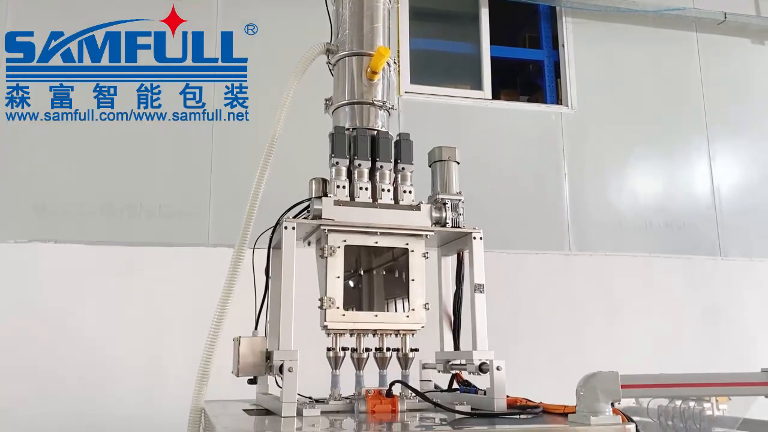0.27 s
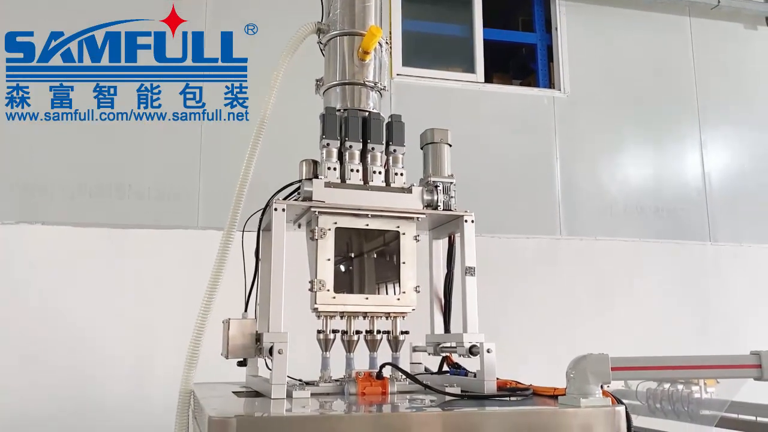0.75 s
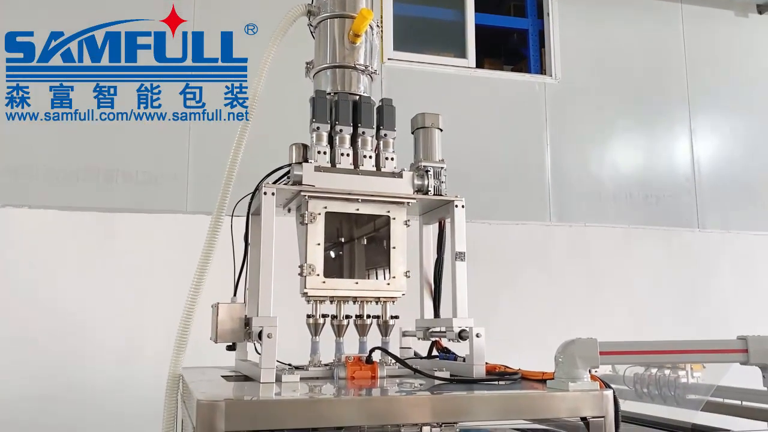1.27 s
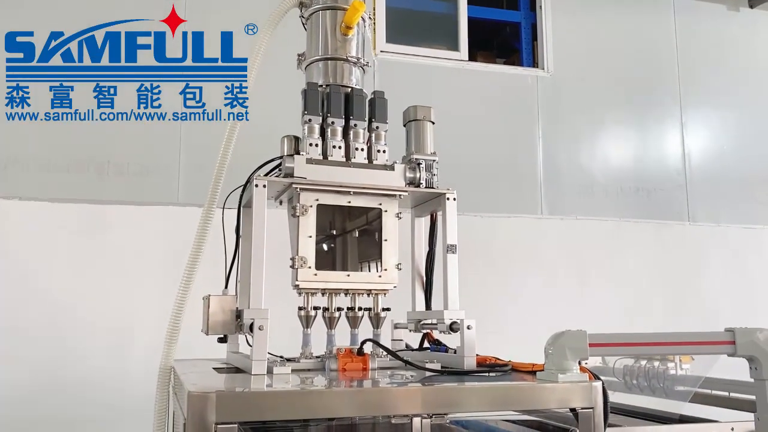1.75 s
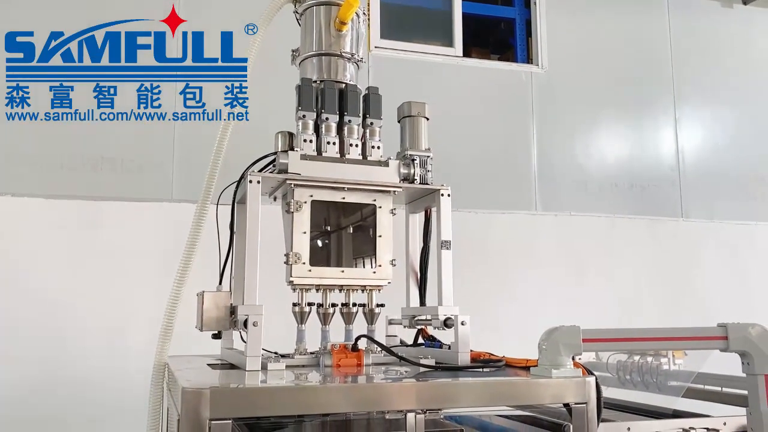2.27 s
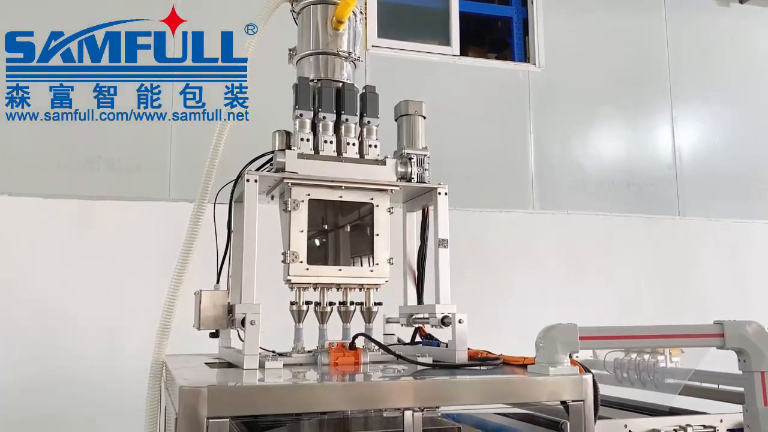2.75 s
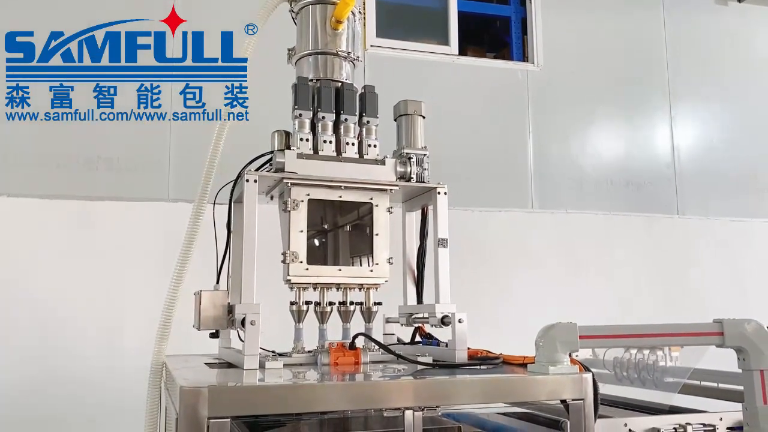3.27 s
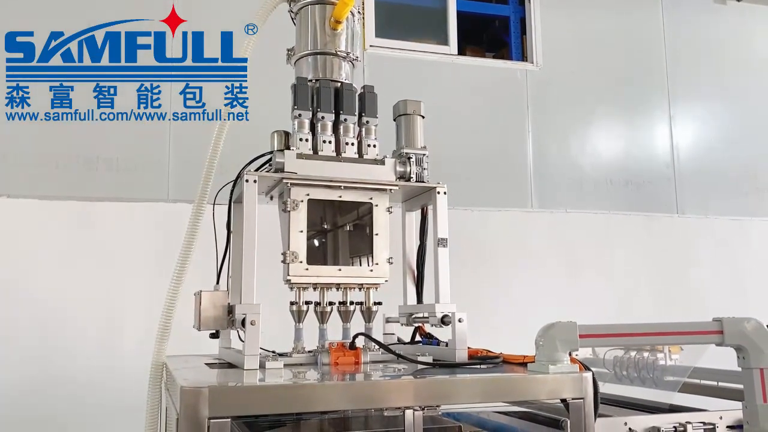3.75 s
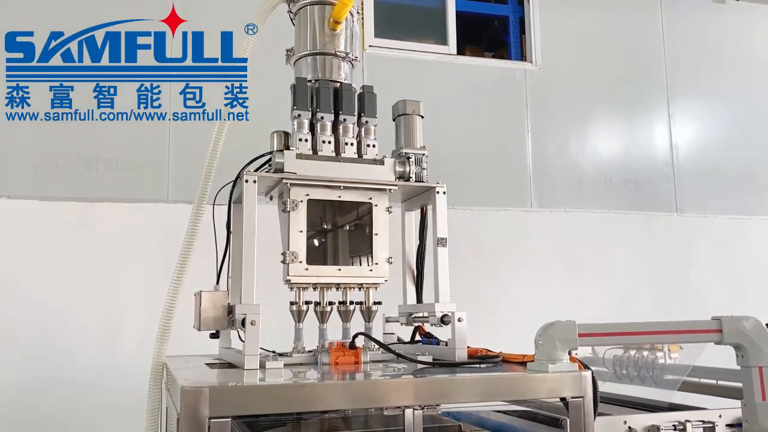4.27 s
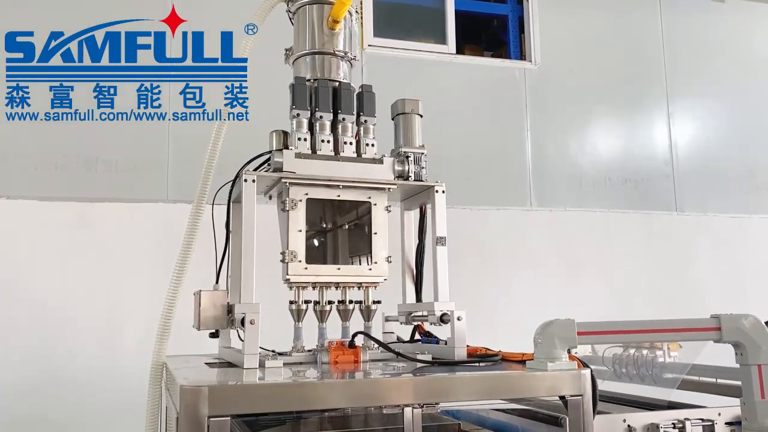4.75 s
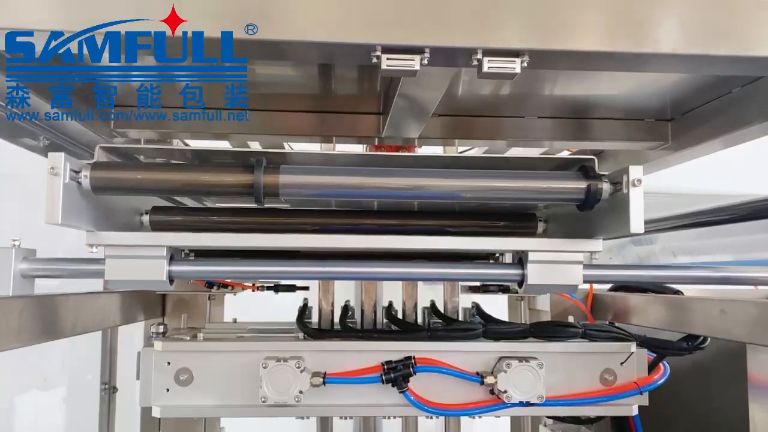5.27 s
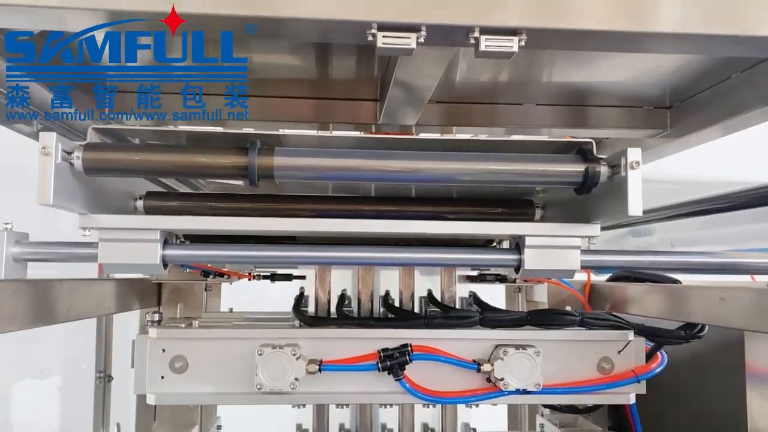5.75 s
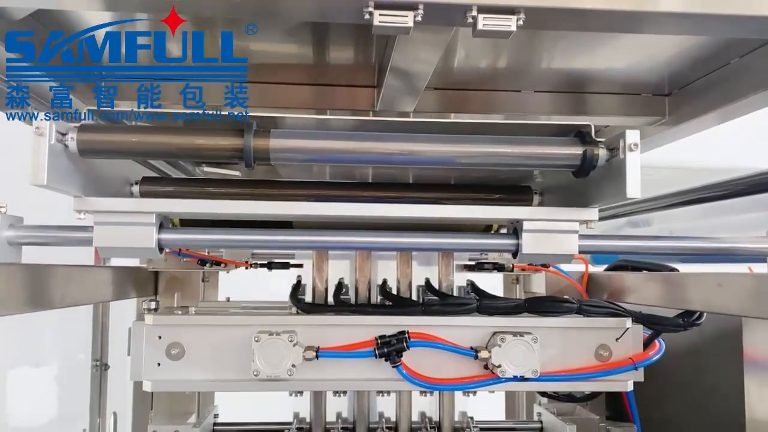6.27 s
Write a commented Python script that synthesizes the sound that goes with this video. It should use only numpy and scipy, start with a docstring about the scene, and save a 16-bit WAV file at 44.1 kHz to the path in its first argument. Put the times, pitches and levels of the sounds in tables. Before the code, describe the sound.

A packing machine is heard from a distance in a factory hall, over a pump hum and the murmur of other machines. Its drive is already running, shudders deeply at 0.4 seconds, then coasts down, rumbling, droning and rattling with a rapid metallic scrape. Cylinders thump and clack irregularly throughout, and two servos hold a thin, stuttering high whine. Valves vent air at about 1.9 and 2.3 seconds, and a rough motor buzz lasts from 2.3 to 3.1, with a short squeak near its end. At 3.2 the drive spins up again with another puff and a cluster of thumps. A squeaky groan follows from 4 to 4.6. Just before 5 seconds comes a blink of silence, and the whine ends. The machine returns close up, under its rollers, with a stronger drone, constant hiss, more thumps and air puffs at 5.4 and 6.4 seconds.

```python
"""A factory hall with a powder packing machine, heard from afar, then, after a blink of silence, from
under its rollers. In each stroke the drive spins up, holds and coasts down, scraping once a turn;
the frame rumbles, drones and rattles with its speed. Cylinders thump against their stops, valves vent
air, a feed motor buzzes between two strokes and a few squeaks come and go.
Behind it all a pump hums and distant machines murmur; two servos whine until the silence."""
import sys
import numpy as np
from scipy import signal
from scipy.fft import rfft, irfft, next_fast_len
from scipy.io import wavfile
from scipy.ndimage import uniform_filter1d, map_coordinates

SR = 44100
rng = np.random.default_rng(int(sys.argv[2]) if len(sys.argv) > 2 else 0)


def pcm_store(signal):
    """Save signal as 16-bit PCM."""
    levels = np.round(np.clip(np.atleast_2d(signal), -1, 1) * 32767)
    wavfile.write(sys.argv[1], SR, levels.astype(np.int16).T)


N = 287532
TIME = np.arange(N) / SR
GAP_START_S, GAP_END_S = 4.93, 4.961  # the silence between far and near
TOP_SPEED, IDLE_SPEED = 46.9, 14  # turns a second
DRIVEN_S = .71  # the drive is powered this long in each stroke


def amp(db):
    """Decibels to gain."""
    return 10 ** (np.asarray(db) / 20)


def unit(x):
    """Scaled to rms 1."""
    return x / np.sqrt(np.mean(x ** 2) + 1e-20)


def along(points, hz):
    """A curve of (f/Hz, value) points, read on a log frequency axis."""
    f, values = np.transpose(points)
    return np.interp(np.log(hz + 1), np.log(f + 1), values)


def wobble(rate):
    """A smooth random curve with `rate` knots a second."""
    return map_coordinates(rng.standard_normal(int(N * rate / SR) + 4), [TIME * rate], order=2)


def phase_of(hz):
    """Running phase of a frequency curve."""
    return 2 * np.pi * np.cumsum(hz) / SR


def filtered(x, response):
    """x through an EQ whose gain is a function of frequency."""
    size = next_fast_len(N + SR // 4)
    return irfft(rfft(x, size) * response(np.fft.rfftfreq(size, 1 / SR)), size)[..., :N]


def coloured(x, spectrum):
    """x shaped by a (f/Hz, level/dB) curve, at rms 1."""
    return unit(filtered(x, lambda hz: amp(along(spectrum, hz))))


def ringing(modes, f):
    """Summed response of resonances given as (f/Hz, width/Hz, level/dB)."""
    return sum(amp(db) * 1j * f * width / (hz * hz - f * f + 1j * f * width) for hz, width, db in modes)


def diffuse(pair, spectrum):
    """Two unrelated signals as one sound from all round: centred bass, wide treble."""
    # likeness of left and right: f/Hz, correlation
    likeness = [(60, 0.98), (130, 0.94), (250, 0.98), (400, 0.72), (700, 0.18), (3000, 0.4), (15000, 0.084)]
    spread = lambda hz: np.arccos(np.clip(along(likeness, hz), -1, 1)) / 2
    response = lambda hz: amp(along(spectrum, hz)) * [np.cos(spread(hz)), np.sin(spread(hz))]
    mid, side = filtered(pair, response)
    return unit(np.array([mid + side, mid - side]))


def factory(hall_db=-32):
    """The bed: distant machines fill the hall under an unsteady pump hum."""
    # pump and mains tones: f/Hz, level/dB
    tones = [(99, -38), (247.6, -44.5), (298, -43.5), (495.3, -44.5), (990.5, -55), (1733, -66),
             (1986, -61), (2234, -59), (2729, -64.5)]
    # room tone: f/Hz, relative level/dB
    room_tone = [(20, -51), (45, -0.5), (100, 3), (250, -4.5), (550, -10.5), (1000, -17), (2000, -20.5),
                 (4000, -28.5), (6500, -31.5), (8500, -49.5), (12000, -30.5), (15500, -72)]
    hum = sum(amp(db + 2.66 * wobble(9.8)) * np.sin(2 * np.pi * hz * TIME + 0.74 * wobble(12))
              for hz, db in tones)
    murmur = amp(hall_db) * diffuse(rng.standard_normal((2, N)), room_tone)
    return (np.sqrt(2) * hum + murmur) * amp([[.6], [-.6]])


def stroke():
    """The machine's cycle: per sample, the age/s of the current stroke, then its settings."""
    # drive strokes: t/s, time already run/s, scrape level/dB, scrape's speed exponent,
    # rattle level/dB, rattle linger/s, rattle's speed exponent, rattle floor/dB
    strokes = [(0, 0.26, -28, 3.3, -25, 0.21, 2.97, -43.5),
               (3.17, 0.017, -28.5, 4.2, -24.5, 0.26, 2.5, -34),
               (4.95, 0.61, -30, 7, -25.5, .33, 4.8, -38.5)]
    rows = np.array(strokes)
    start, already_run, *settings = rows[np.searchsorted(rows[1:, 0], TIME)].T
    return TIME - start + already_run, *settings


def drive_speed(linger_s=0, spin_up_s=.09, half_speed_s=1.1):
    """Turns a second: the drive spins up, holds, then coasts down towards idle."""
    age = np.maximum(stroke()[0], 0)
    spin_up = 1 - np.exp(-age / spin_up_s)
    coasting_s = np.maximum(age - DRIVEN_S - linger_s, 0)
    return np.maximum(TOP_SPEED * spin_up / (1 + coasting_s / half_speed_s), IDLE_SPEED)


def speed_db(speed):
    """A speed in dB relative to top speed."""
    return 20 * np.log10(speed / TOP_SPEED)


def frame(spectrum, base_db, gear_db, drone_db, base_exponent, drone_exponent, heave_db, critical_db):
    """The heavy base rumbles, heaves and carries the gear tones; the panels drone above it."""
    # vibration of the geared shafts: multiple of drive speed, relative level/dB
    gear_orders = [(1, -4), (1.5, -0.5), (2, -1.5), (3, -2), (5, -3), (9, -14.5)]
    split_hz, crest_s, heave_period_s = 165, 0.44, 0.36
    critical_speed, critical_width = 33.5, 8  # turns a second
    age, speed = stroke()[0], drive_speed()
    shake = diffuse(rng.standard_normal((2, N)), spectrum)
    base = filtered(shake, lambda f: 1 / (1 + (f / split_hz) ** 8))
    shaft = phase_of(speed)
    gears = unit(sum(amp(db + 2.5 * wobble(8.2)) * np.sin(order * shaft + 0.4 * wobble(7))
                     for order, db in gear_orders))
    rumble = amp(base_db) * unit(base) + amp(gear_db) * (speed / speed.max()) ** 3 * gears
    heave = np.cos(2 * np.pi * (age - crest_s) / heave_period_s) * (speed > TOP_SPEED / 2)
    rumble *= amp(base_exponent * speed_db(speed) + heave_db * heave)
    # coasting through a critical speed excites the panels
    resonance = np.exp(-((speed - critical_speed) / critical_width) ** 2) * (age > DRIVEN_S)
    drone = amp(drone_db + drone_exponent * speed_db(speed) + critical_db * resonance) * unit(shake - base)
    return rumble * amp([[.4], [-.4]]) + drone * amp([[1.3], [-1.3]])


def sheet_metal(t60, ring_db=-5):
    """Stereo noise coloured by the crowded resonances of sheet metal."""
    noise = rng.standard_normal((2, N))
    t = np.arange(SR // 8) / SR
    ring = rng.standard_normal((2, len(t))) * amp(-60 * t / t60)
    return noise + amp(ring_db) * unit(signal.fftconvolve(noise, ring, axes=1)[:, :N])


def rattle(spectrum, modes, trim_db, knock_db, knocks_per_s=110, decay_s=0.0058):
    """Loose parts knock at random on the panels and are the last to settle as the drive slows."""
    *_, top_db, linger_s, exponent, floor_db = stroke()
    level_db = np.maximum(top_db + exponent * speed_db(drive_speed(linger_s)), floor_db)
    level_db += trim_db + 0.32 * wobble(14)
    knocks = (rng.random(N) < knocks_per_s / SR) * amp(0.53 * rng.standard_normal(N))
    bursts = unit(signal.lfilter([1], [1, -np.exp(-1 / (decay_s * SR))], knocks))
    clatter = np.hypot(1, amp(knock_db) * bursts) * sheet_metal(t60=0.25)
    panels = filtered(clatter, lambda f: 1 + ringing(modes, f))
    return amp(level_db) * diffuse(panels, spectrum) * amp([[.3], [-.3]])


def machine_far():
    """The shaking frame from a distance: its drone swells as the drive coasts."""
    # rumble and drone EQ: f/Hz, relative level/dB
    rumble_eq = [(24, -41), (40, 3), (54, -1), (75, 7), (98, 4), (118, 0.5), (150, 1), (183, -2.5),
                 (222, -1), (257, -4.5), (338, -8.5), (388, -12), (422, -12.5), (464, -20), (500, -13),
                 (650, -28.5), (1100, -120)]
    # rattle EQ: f/Hz, relative level/dB
    rattle_eq = [(280, -34), (420, 2.5), (480, -1.5), (560, 1.5), (720, -3.5), (870, -4.5), (1130, -6),
                 (1450, -9.5), (1750, -9.5), (2400, -16.5), (4000, -20.5), (8000, -25), (15000, -127)]
    # panel resonances: f/Hz, width/Hz, level/dB over the rattle
    panel_modes = [(723, 27, -0.5), (1095, 29, 1), (1156, 23, -1.5), (1243, 18, -6), (1410, 15, 3.5),
                   (1757, 59, -8)]
    body = frame(rumble_eq, base_db=-24, gear_db=-22, drone_db=-24.8,
                 base_exponent=1.36, drone_exponent=1.42, heave_db=1.38, critical_db=4.5)
    return body + rattle(rattle_eq, panel_modes, trim_db=-2.5, knock_db=-5)


def scrape(burst_s=0.0029, far_catch_db=11.5, near_catch_db=2, build_db_per_s=5.5):
    """The drive rubs all the time and catches hard once a turn, ringing the steel."""
    # steel resonances: f/Hz, width/Hz, relative level/dB
    steel_modes = [(6660, 194, -3), (10040, 460, -9), (11690, 60, -4), (12050, 163, 0), (13100, 900, -11)]
    # friction hiss beneath them: f/Hz, relative level/dB
    hiss_eq = [(800, -31), (2800, -12.5), (4300, -12), (5500, -10.5), (11000, -15), (15500, -34)]
    age, top_db, exponent, *_ = stroke()
    speed = drive_speed()
    level_db = top_db + exponent * speed_db(speed) - build_db_per_s * np.maximum(DRIVEN_S - age, 0)
    turns = np.cumsum(speed) / SR
    burst_age = turns % 1 / speed / burst_s
    scatter_db = 1.7 * rng.standard_normal(512)
    catch_db = np.where(TIME < GAP_START_S, far_catch_db, near_catch_db) + scatter_db[turns.astype(int)]
    burst = (2 * burst_age * np.exp(1 - 2 * burst_age)) ** 2
    catch = amp(catch_db) * speed / TOP_SPEED * burst  # harder at speed
    friction = np.hypot(1, catch) * amp(0.56 * wobble(1500)) * rng.standard_normal(N)
    steel = filtered(friction, lambda f: np.hypot(abs(ringing(steel_modes, f)), amp(along(hiss_eq, f))))
    return amp(level_db) * unit(steel)


def hall_tail():
    """A stereo reverb tail whose treble dies first."""
    # decay of the hall: f/Hz, t60/s
    decay = [(200, 0.81), (3000, 0.34), (12000, 0.015)]
    hz, t, noise = signal.stft(rng.standard_normal((2, SR // 3)), SR, nperseg=256)
    t60 = along(decay, hz)[:, None]
    tail = signal.istft(noise * amp(-60 * t / t60) / np.sqrt(t60), SR, nperseg=256)[1]
    return tail / np.linalg.norm(tail[0])


def in_hall(x, block=16384, left_lead_s=.000163):
    """The direct sound arrives on the left first; the walls add an ever-changing tail."""
    # wet mix: f/Hz, share of power that comes off the walls
    wet_mix = [(300, 0.7), (3000, 1), (5000, 0.8), (6500, 0.31), (9000, 0.0037), (15000, 0.046)]
    wet = np.zeros((2, N + SR))
    for start in range(0, N, block):
        echo = signal.fftconvolve(x[None, start:start + block], hall_tail(), axes=1)
        wet[:, start:start + echo.shape[1]] += echo
    share = lambda f: np.clip(along(wet_mix, f), .01, .99)
    lead = lambda f: np.exp(1j * np.pi * f * left_lead_s * np.array([[1], [-1]]))
    direct = filtered(x, lambda f: np.sqrt(1 - share(f)) * lead(f))
    return direct + filtered(wet[:, :N], lambda f: np.sqrt(share(f)))


def servo_whine(start_hz=5828, creep_hz_per_s=27, beat_hz=17, second_gain=.8, skew_rad=0.73):
    """Two servos sing a thin note and its octave, stuttering as they beat; lost under the rollers."""
    # whine faders: t/s, note level/dB, octave level/dB
    faders = [(0, -52, -53), (.85, -50.5, -53), (1.15, -44.5, -50), (1.45, -47, -50), (1.73, -53.5, -53),
              (1.83, -45, -49), (2.03, -47, -51), (2.12, -51, -55), (2.22, -42.5, -50), (2.6, -51, -54),
              (4.4, -48.5, -51), (4.9, -52.5, -55)]
    times, *levels = np.transpose(faders)
    phase = phase_of(start_hz + creep_hz_per_s * TIME + 9 * wobble(4) + 6 * wobble(120))
    whine = 0
    for k, db in enumerate(levels, 1):
        beat = phase_of(beat_hz * (1 + .6 * wobble(12)))
        stereo_phase = k * phase + skew_rad * np.array([[1], [-1]]) * (k == 1)
        gain = amp(np.interp(TIME, times, db) + 2.4 * wobble(55))
        whine += gain * (np.sin(stereo_phase) + second_gain * np.sin(stereo_phase + beat))
    return (TIME < GAP_START_S) * whine


def cylinder_stops(swell_s=0.015, sag_s=0.068, ring_hz=412, ring_t60=0.12):
    """Each cylinder lands with a cushioned thump that sags in pitch and a clack that rings the frame."""
    # hits: t/s, thump f/Hz, thump level/dB, clack level/dB, clack attack/s, ring level/dB
    hits = [(.028, 86, -35, -23.5, 0.015, -18), (.36, 71, -22, -28.5, 0.027, -40),
            (0.521, 108, -17.5, -44, 0.0083, -38), (0.595, 254.6, -16.5, -28, 0.012, -44),
            (.775, 215, -28, -40, .01, -43), (1.235, 225, -26, -35.5, 0.031, -45),
            (1.521, 113, -19, -58, .01, -50), (1.941, 107, -25, -50, .01, -50),
            (2.021, 84, -27, -35.5, 0.039, -27), (2.288, 160, -19, -42, .01, -28),
            (3.104, 162, -13.5, -39, 0.011, -42), (3.118, 84, -17, -39, 0.014, -50),
            (3.196, 91, -15, -35, .01, -45), (3.245, 167, -16.5, -25, 0.019, -21.5),
            (3.462, 242.4, -14, -29.5, 0.016, -21), (3.732, 159, -15.5, -23.5, 0.0097, -28),
            (3.88, 151, -28, -47, 0.011, -16.5), (4.272, 73, -18, -38, 0.0074, -42),
            (4.311, 233, -15, -37, 0.0091, -30), (5.095, 133, -35, -21, 0.015, -17.5),
            (5.325, 228, -14.5, -29, 0.017, -32), (5.746, 166.5, -22, -26, 0.014, -28),
            (5.78, 80, -18.5, -42, .01, -38), (5.805, 255, -14, -34, 0.03, -25.5),
            (6.149, 200, -29, -32, 0.015, -44), (6.458, 148, -19.5, -46, .01, -45)]
    # clack EQ: f/Hz, relative level/dB
    clack_eq = [(300, -6.5), (500, 8), (1000, 3), (1700, -2), (2300, -6), (2750, -14.5), (6000, -10.5),
                (9000, -45), (15000, -50)]
    thump, clack, ring = np.zeros((3, N))
    for start, hz, thump_db, clack_db, attack_s, ring_db in hits:
        age = np.maximum(TIME - start, 0)
        swell = (age / swell_s * np.exp(1 - age / swell_s)) ** 2
        sagging_hz = hz * (age > 0) * (1 + np.exp(-age / sag_s)) / 2
        thump += amp(thump_db) * swell * np.sin(phase_of(sagging_hz))
        clack += amp(clack_db) * age / attack_s * np.exp(1 - age / attack_s)
        ring_envelope = amp(ring_db - 60 * age / ring_t60) * 2 * (1 - np.exp(-age / swell_s))
        ring += ring_envelope * np.sin(2 * np.pi * ring_hz * age)
    return thump + ring + clack * diffuse(sheet_metal(t60=0.15), clack_eq)


def shudder(at_s=0.355, width_s=0.039, hz=69, db=-17.5):
    """The base gives one deep shudder as the drive reaches top speed."""
    swell = np.exp(-((stroke()[0] - at_s) / width_s) ** 2)
    return amp(db) * swell * np.sin(2 * np.pi * hz * TIME + 0.43 * wobble(16))


def compressed_air(leak_db=-37):
    """Valves vent in hissing puffs; close to the rollers a constant hiss joins them."""
    # valve puffs: t/s, attack/s, hold/s, t60/s, level/dB
    puffs = [(1.915, 0.038, 0.14, 0.72, -35.5), (2.263, 0.08, 0.84, 1.3, -32),
             (3.202, 0.015, 0.044, 3.2, -33), (5.41, 0.023, 0.033, 0.23, -35),
             (6.449, .015, .1, 0.27, -32.5)]
    # puff EQ: f/Hz, relative level/dB
    puff_eq = [(600, 2.5), (2000, 5), (4000, 3.5), (6500, 1.5), (8300, 2.5), (11000, 2.5), (13000, 2),
               (15500, -2.5)]
    # constant hiss EQ: f/Hz, relative level/dB
    leak_eq = [(800, -34), (2200, -6), (3600, 1.5), (6500, -4.5), (9000, -7.5), (10000, -2.5), (12000, -7),
               (14300, -8), (15500, -29)]
    power = 0
    for start, attack_s, hold_s, t60, db in puffs:
        opening = np.clip((TIME - start) / attack_s, 0, 1)
        power += (opening * amp(db - 60 * np.maximum(TIME - start - hold_s, 0) / t60)) ** 2
    vents = np.sqrt(power) * coloured(rng.standard_normal(N), puff_eq)
    leak = amp(leak_db) * (TIME > GAP_START_S) * coloured(rng.standard_normal(N), leak_eq)
    return (vents + leak) * amp(wobble(6.8))


def feed_motor(on_s=2.275, off_s=3.075, hz=543, db=-33.5, attack_s=.015, t60=.5, blur_rad=1.1):
    """A rough motor buzz from all round: nine wavering partials, the lowest two kicking at the start."""
    # buzz EQ: f/Hz, relative level/dB
    buzz_eq = [(540, 5), (1080, 1), (1620, -2.5), (2160, -2), (2700, -14), (3250, -8), (3800, -9.5),
               (4330, -5), (4860, -6.5)]
    age = np.maximum(TIME - on_s, 0)
    envelope = np.minimum(age / attack_s, 1) * amp(db - 60 * np.maximum(TIME - off_s, 0) / t60)
    kick_db = 7 * np.exp(-((age - .025) / .03) ** 2)
    phase = phase_of(hz * (1 + .016 * wobble(120) + .009 * wobble(14)))
    buzz = np.zeros((2, N))
    for side in buzz:
        for k in range(1, 10):
            side += amp(kick_db * (k <= 2) + 3 * wobble(30)) * np.sin(k * phase + blur_rad * wobble(110))
    return envelope * diffuse(buzz, buzz_eq)


def squeaks():
    """Short unsteady squeaks and groans swell and fade."""
    # squeak cues: t/s, length/s, f/Hz, level/dB, phase blur/rad
    cues = [(2.895, 0.097, 1243, -29, 0.22), (3.27, 0.2, 14170, -39, 3.2), (4.045, 0.41, 1122, -33.5, 2.2),
            (4.098, 0.49, 558.4, -28.5, 1.46)]
    sound = 0
    for start, length, hz, db, blur in cues:
        swell = np.sin(np.pi * np.clip((TIME - start) / length, 0, 1))
        sound += amp(db) * swell * np.sin(2 * np.pi * hz * TIME + blur * wobble(90))
    return sound


def machine_near():
    """The shaking frame from under the rollers: more panel drone over a steadier base."""
    # rumble and drone EQ: f/Hz, relative level/dB
    rumble_eq = [(24, -34), (40, -6), (59, -0.5), (75, -9), (92, -11), (129, 4.5), (177, -7.5),
                 (193, -15.5), (226, 4.5), (239, -4), (265, -9), (324, -10), (364, -11), (413, -16),
                 (500, -22), (650, -36), (1100, -120)]
    # rattle EQ: f/Hz, relative level/dB
    rattle_eq = [(280, -37), (380, 3.5), (480, -4.5), (570, -1.5), (750, 1), (900, -6), (1200, -7.5),
                 (1500, -11), (1850, -9.5), (2600, -17.5), (4000, -23), (8000, -50), (15000, -60)]
    # panel resonances: f/Hz, width/Hz, level/dB over the rattle
    panel_modes = [(559, 25, 4), (1100, 64, -3), (1485, 76, -2), (1770, 130, -6), (2160, 58, -1)]
    body = frame(rumble_eq, base_db=-26.5, gear_db=-23, drone_db=-19.5,
                 base_exponent=0.66, drone_exponent=2.09, heave_db=0.56, critical_db=0)
    return body + rattle(rattle_eq, panel_modes, trim_db=0, knock_db=-7)


def scene():
    """The machine in its hall, from a distance and then from under its rollers."""
    machine = np.where(TIME < GAP_START_S, machine_far(), machine_near())
    bright = in_hall(scrape() + compressed_air() + squeaks()) * amp([[-.3], [.3]])
    return machine + bright + feed_motor() + shudder() + cylinder_stops() + servo_whine() + factory()


def record(dry, low_cut_hz=38, high_cut_hz=15780):
    """Trims the deepest bass and the top treble, and mutes the moment between far and near."""
    gate = uniform_filter1d(((TIME < GAP_START_S) | (TIME > GAP_END_S)) * 1., size=64)
    lean = filtered(dry, lambda hz: (hz / low_cut_hz) ** 4 / np.hypot(1, (hz / low_cut_hz) ** 4))
    return filtered(lean * gate, lambda hz: hz < high_cut_hz)


dry = scene()
out = record(dry)
pcm_store(out)
```